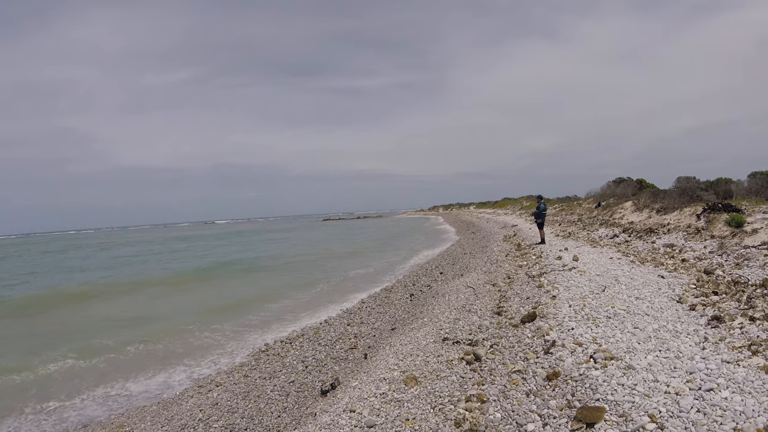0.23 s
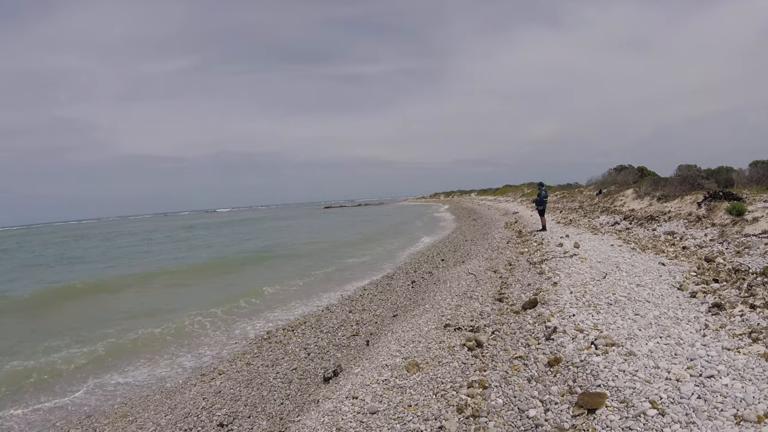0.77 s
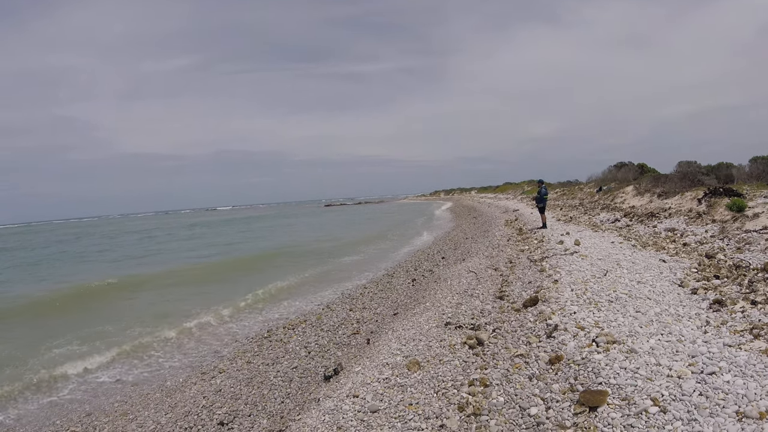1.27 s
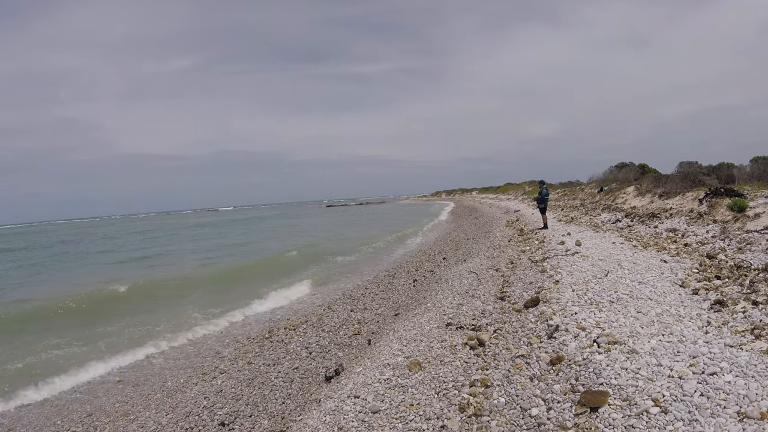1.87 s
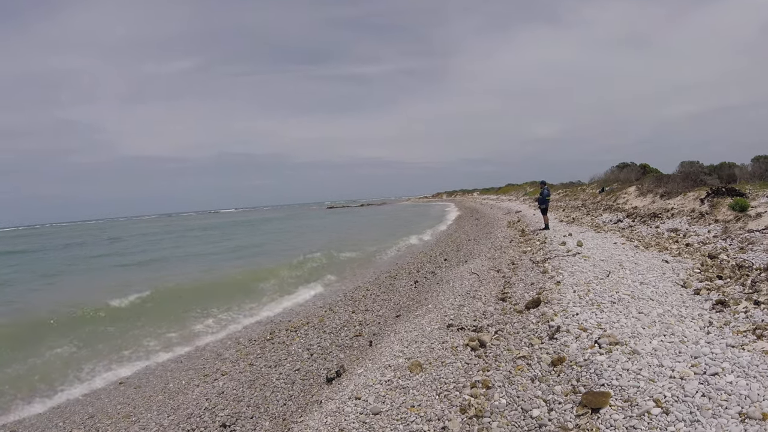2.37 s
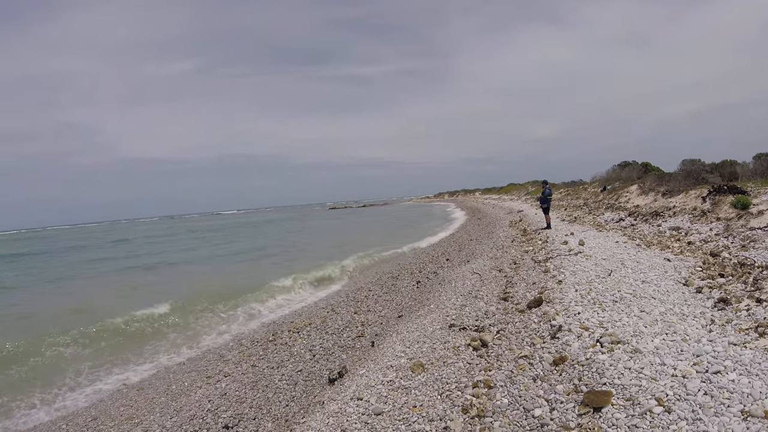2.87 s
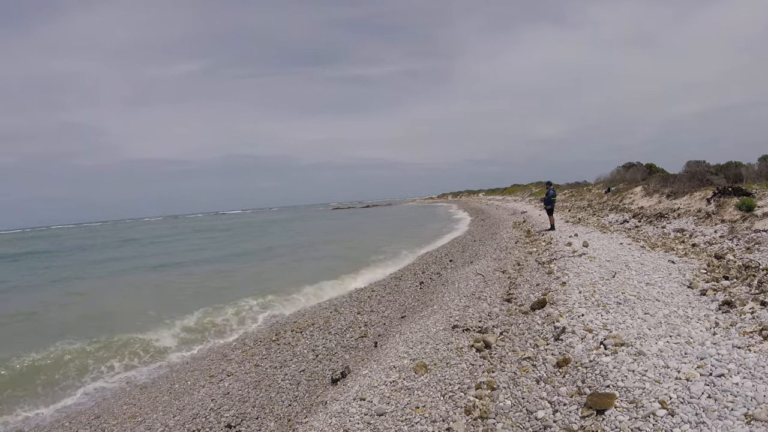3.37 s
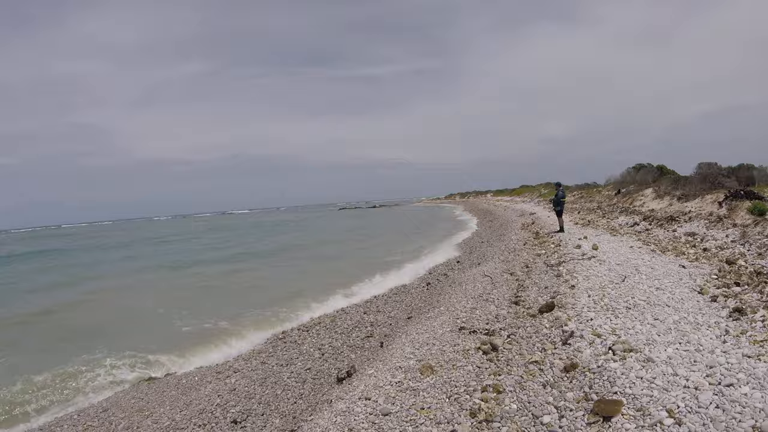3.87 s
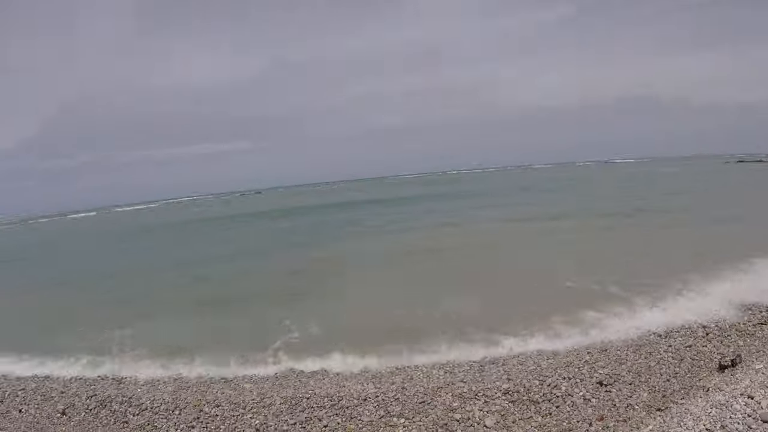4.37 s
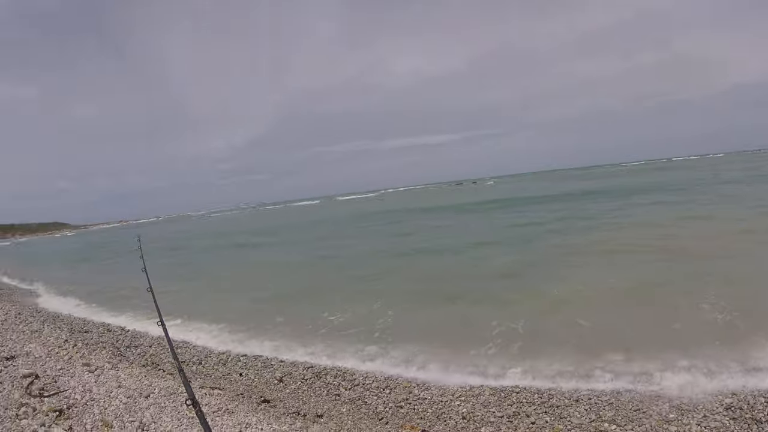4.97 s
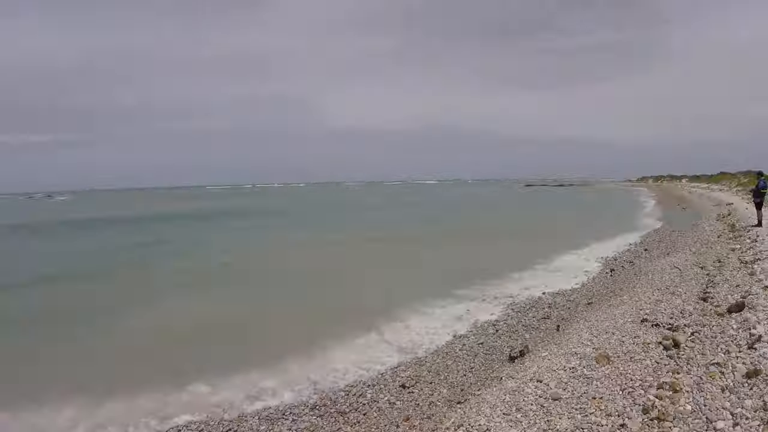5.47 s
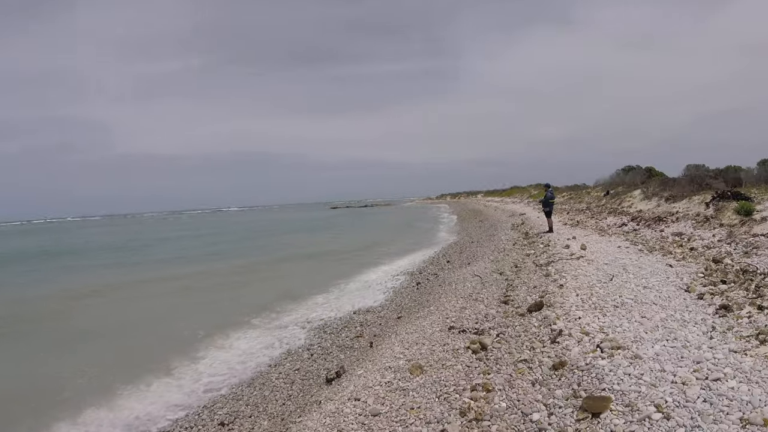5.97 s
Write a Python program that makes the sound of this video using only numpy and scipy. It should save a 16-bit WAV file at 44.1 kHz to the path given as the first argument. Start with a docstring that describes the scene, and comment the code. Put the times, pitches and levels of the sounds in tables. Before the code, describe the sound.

Low wind rumbles on the microphone throughout, on an open pebble beach with a faint hush of distant sea. A cluster of short, rough buffets hits in the first 0.7 seconds, and a couple of stones knock around 1 second. From about 1.2 seconds a small wave spills along the shore, with several watery plops until 1.9 seconds and a light fizz of foam. More wind thuds land between 2 and 3.3 seconds. The surf builds from about 3 seconds, and a larger wave breaks close by near 3.8 seconds with a soft boom. It churns and hisses up the shingle, rolling stones, strongest from 4.2 to 5 seconds. It then drains back with thinning, crackling foam and single pebbles clicking. From about 5.9 seconds another run of strong buffets strikes the microphone.

```python
"""Wind rumbles on the microphone and hits it in short, rough buffets, on an open pebble beach.
A small wave spills along the shore with a few plops; a larger one breaks close by, fizzes up the
shingle and drains back, leaving single stones clicking. The wind is low pressure noise, swelled by
gusts. The surf is clouds of tiny rings over a noise bed: air pockets boom, bubbles churn, stones
roll and foam fizzes."""
import sys
import numpy as np
from scipy import signal
from scipy.fft import rfft, irfft, next_fast_len
from scipy.io import wavfile
from scipy.ndimage import uniform_filter1d, minimum_filter1d

SR = 44100
rng = np.random.default_rng(int(sys.argv[2]) if len(sys.argv) > 2 else 0)


def unload_wav(signal):
    """Save mono or channel-first audio to the path in sys.argv[1] as 16-bit WAV at rate SR, clipped to [-1, 1]."""
    wavfile.write(
        sys.argv[1],
        SR,
        np.round(np.clip(np.atleast_2d(signal).T, -1, 1) * 32767).astype(np.int16),
    )


N = 274344
TIME = np.arange(N) / SR

# Cue sheets; levels are relative, ahead of each layer's trim and swing.
# wind strength on the microphone: t/s, level/dB
WIND_RIDE = [(0, -21), (.22, -19), (.7, -17), (.97, -22), (1.2, -17), (1.9, -19), (2.8, -18), (3.4, -17.5),
             (4.3, -18), (4.58, -19), (4.8, -18.5), (5.55, -19), (5.95, -15.5), (6.22, -17)]
# single gusts: centre t/s, half-width/s, heave level/dB, flutter level/dB
GUST_CUES = [(0.195, 0.071, -16.5, -38), (0.427, 0.27, -14.5, -19.5), (0.855, 0.084, -13, -24.5),
             (1.08, 0.044, -12, -21), (1.207, .08, -16.5, -20), (1.398, 0.017, -13, -20.5),
             (1.578, 0.05, -15.5, -30), (1.72, 0.13, -15.5, -23), (2.103, 0.04, -13.5, -26),
             (2.166, 0.035, -26, -16), (2.306, 0.073, -13, -25.5), (2.43, 0.028, -10, -24),
             (2.664, 0.16, -19, -21.5), (2.98, 0.057, -18, -19.5), (3.209, 0.073, -12.5, -20),
             (3.485, 0.056, -32, -21.5), (3.902, 0.063, -18, -21), (4.113, 0.059, -32, -21),
             (4.286, .05, -26, -19), (4.707, 0.031, -14, -24), (4.88, .12, -14, -27),
             (5.15, 0.033, -14, -31), (5.26, 0.15, -17, -31), (5.593, 0.038, -24, -21),
             (5.783, 0.029, -15, -21)]
# vortex hits: t/s, thud level/dB, length/s, rasp level/dB
BUFFET_CUES = [(0.017, -14.5, 0.0078, -39), (0.246, -13, 0.01, -32), (0.321, -15.5, 0.019, -29),
               (0.338, -18.5, 0.027, -29), (0.367, -21, 0.019, -25), (0.422, -10.5, 0.012, -24),
               (0.451, -30, 0.0062, -20), (0.465, -15.5, 0.03, -50), (0.514, -16.5, .018, -26),
               (0.574, -20.5, 0.014, -28), (0.637, -14, 0.024, -33), (0.671, -18.5, 0.008, -22),
               (1.838, -16, 0.069, -53), (2.145, -11, 0.024, -31), (2.244, -15.5, 0.11, -41),
               (2.332, -12, 0.02, -25), (2.679, -13.5, 0.016, -45), (2.943, -15.5, 0.013, -24.5),
               (3.196, -11, 0.019, -21.5), (3.289, -14.5, 0.04, -43), (5.876, -14.5, 0.046, -31),
               (5.881, -14, 0.013, -20), (5.938, -11, 0.021, -30), (5.95, -23, 0.03, -19),
               (5.979, -12, 0.035, -28), (6.017, -14, 0.042, -23), (6.052, -9, 0.011, -21),
               (6.14, -12, 0.029, -23)]
# short sharp clicks (a tick of wind rasp at 0.45 s, then stones knocking): t/s, level/dB, f/Hz
CLICK_CUES = [(.1666, -37, 2280), (.45, -22.5, 2070), (.4829, -25.5, 2550), (0.902, -16.5, 1800),
              (0.9747, -30, 3370), (1.028, -17, 1770), (1.723, -31, 2400), (2.0439, -28, 2900),
              (5.0974, -27, 5030), (5.207, -24, 5160), (5.6611, -41, 5600), (5.8013, -34, 4950),
              (6.0872, -29, 3080)]
# large bubbles in the spilling crest: t/s, level/dB, starting f/Hz
PLOP_CUES = [(1.315, -17.5, 1220), (1.35, -17.5, 1070), (1.504, -18, 1070), (1.575, -20, 950),
             (1.775, -19.5, 910), (1.868, -19.5, 1240), (2.547, -25.5, 1044)]
# waves running up: t/s, hold/s, build/(dB/s), ebb/(dB/s), churn level/dB, shingle level/dB
RUN_UPS = [(1.2, 0.68, 11, 12, -32.5, -37.5), (4.271, .68, 12.5, 23, -23.5, -29.5),
           (6.45, .6, 20, 20, -25, -40)]
# stretches of crest collapsing:
# t/s, rise per 10 dB/s, foam hold/s, foam level/dB, plunge level/dB, plunge hold/s
COLLAPSES = [(1.285, 0.23, 0.49, -50, -34.5, 0.22), (1.596, 0.33, .95, -44.5, -33, 0.18),
             (2.826, 0.27, 0.83, -43.5, -37, 0.22), (3.21, 0.1, 1.4, -39, -29.5, 0.33),
             (3.756, 0.14, 0.6, -34, -20.5, 0.08), (4.216, 0.13, .55, -29, -23, 0.3),
             (6.35, 0.98, .5, -48.5, -40, .3)]

# EQ curves, all f/Hz, level/dB
FAR_SEA_EQ = [(300, -3), (800, 5.5), (2000, -10), (4000, -19), (7000, -19.5), (11000, -26.5),
              (12000, -13.5), (15000, -32)]  # distant hush
HEAVE_EQ = [(5, -46), (16, -4), (26, 3.5), (40, 0), (80, -4), (110, -13.5), (200, -30), (500, -81.5)]  # large eddies
FLUTTER_EQ = [(55, -19), (90, 0), (120, -2), (200, -9.5), (290, -16), (500, -26), (1000, -42), (3000, -75),
              (10000, -84)]  # small eddies
THUD_EQ = [(60, -11.5), (125, 1.5), (190, 1), (260, -8), (400, -15.5), (650, -23.5), (1500, -61),
           (4000, -88)]  # body of a buffet
RASP_EQ = [(200, 0), (400, 7.5), (600, 5.5), (900, -2.5), (1250, -13.5), (2200, -23.5), (3300, -33.5),
           (5500, -65), (9000, -89)]  # its torn edge
FIZZ_EQ = [(1500, -7.5), (3200, -5), (4200, -10.5), (4600, -4.5), (5100, 1), (6100, -0.5), (6900, -11.5),
           (8500, -14.5), (10500, -20), (15000, -34.5)]  # fresh foam
SPRAY_EQ = [(3000, 1.5), (6000, -3), (8000, -2.5), (10500, -4.5), (15000, -17)]  # flying droplets
CRACKLE_EQ = [(2000, -14), (4200, -7), (5500, 0), (7000, -5), (10500, -8), (15000, -19)]  # single foam bursts
PLUNGE_EQ = [(90, -34), (200, 3.5), (330, -1.5), (550, -5), (800, -11), (1300, -16), (3000, -56)]  # trapped air pockets
CHURN_EQ = [(200, -22.5), (450, -0.5), (750, -2), (1100, -1.5), (1400, -5), (1900, -12.5), (4000, -54)]  # bubbling water
SHINGLE_EQ = [(800, 1), (1500, -6.5), (2000, 1.5), (2400, -2), (2800, -8), (3300, -9.5), (4200, -17),
              (6000, -19.5), (9000, -34), (15000, -52)]  # rolling stones
HOUSING_EQ = [(10600, 0.5), (11300, -6.5), (12000, -15), (13400, -2.5), (15000, -9)]  # microphone housing, notched near 12 kHz
TICK_EQ = [(2500, -5), (4000, -8), (7000, -31)]  # settling pebbles
SPLASH_EQ = [(500, -13), (1100, 10), (2000, -6), (3500, -23), (8000, -43)]  # water landing


def from_db(db):
    """Decibels to gain."""
    return 10 ** (np.asarray(db) / 20)


def rms_one(x):
    """Scale to unit power."""
    return x / np.sqrt(np.mean(x ** 2) + 1e-20)


def together(gains):
    """Unrelated noises add in power."""
    return np.sqrt(sum(g ** 2 for g in gains))


def envelope(start, hold, rise_db_per_s, fall_db_per_s, sag_db_per_s=0):
    """Gain that climbs to 1 at start, sags while it holds, then dies away."""
    age = TIME - start
    return from_db(-rise_db_per_s * np.maximum(-age, 0)
                   - sag_db_per_s * np.clip(age, 0, hold)
                   - fall_db_per_s * np.maximum(age - hold, 0))


def coloured(x, eq):
    """Apply an EQ curve whose points are joined on a log-frequency axis."""
    hz, db = np.transpose(eq)
    size = next_fast_len(N + SR // 10)
    bins = np.maximum(np.fft.rfftfreq(size, 1 / SR), 1)
    gain = from_db(np.interp(np.log(bins), np.log(hz), db))
    return irfft(rfft(x, size) * gain, size)[:N]


def drift(rate):
    """Smooth random wobble of spread 1 that changes about rate times a second."""
    bins = np.fft.rfftfreq(N, 1 / SR)
    return rms_one(irfft(rfft(rng.standard_normal(N)) / (1 + (bins / rate) ** 4), N))


def ring(clicks, hz, t60):
    """Each click sets a damped sine ringing."""
    r = from_db(-60 / (t60 * SR))
    w = 2 * np.pi * min(hz, .45 * SR) / SR
    return signal.lfilter([0, np.sin(w)], [1, -2 * r * np.cos(w), r * r], clicks + 1e-18)


def turbulence(eq, even_s):
    """Pressure noise whose strength holds steady over spans longer than even_s."""
    x = coloured(rng.standard_normal(N), eq)
    span = max(int(even_s * SR), 2)
    power = uniform_filter1d(uniform_filter1d(x ** 2, span), span)
    return x / np.sqrt(power + 1e-12)


def grains(per_s, low_hz, high_hz, cycles, spread_db, count=24):
    """A cloud of short rings of random size and pitch, with an even spectrum between the edges."""
    sizes = from_db(spread_db * np.minimum(rng.exponential(1, N), 4.5)) * rng.choice([-1, 1], N)
    clicks = sizes * (rng.random(N) < per_s / SR)
    voice = rng.integers(0, count, N)
    pitches = np.geomspace(low_hz, high_hz, count)
    return rms_one(sum(np.sqrt(hz) * rms_one(ring(clicks * (voice == k), hz, cycles / hz))
                       for k, hz in enumerate(pitches)))


def wash(near, eq, far_db, surge_db, surge_rate):
    """Near grains sit in the smooth sum of far ones, and all surge together by surge_db."""
    mix = coloured(near + from_db(far_db) * rng.standard_normal(N), eq)
    return rms_one(rms_one(mix) * from_db(surge_db * drift(surge_rate)))


def far_sea(level_db=-49):
    """The distant sea blurs into a steady bed of hush."""
    return from_db(level_db) * rms_one(coloured(rng.standard_normal(N), FAR_SEA_EQ))


def settling(level_db=-58):
    """Loose pebbles tick here and there along the water's edge."""
    ticks = grains(240, 1430, 4800, cycles=11, spread_db=2.5)
    return from_db(level_db) * rms_one(coloured(ticks, TICK_EQ))


def wind(heave_db=-18.5, breeze_db=-24.5, calm_hz=260, wake_db=-3.5, wake_s=0.034):
    """Large eddies heave the diaphragm; small ones flutter, dull in a breeze, brighter in gusts."""
    strength_db = np.interp(TIME, *np.transpose(WIND_RIDE))
    swing_db = strength_db - strength_db.mean()
    heave = from_db(heave_db + swing_db + 1.6 * drift(8.4))
    breeze = from_db(breeze_db + swing_db + 3.5 * np.minimum(drift(14.4), 1))  # deep lulls, mild peaks
    puffs = np.zeros(N)
    for t, width, gust_db, puff_db in GUST_CUES:
        bell = np.exp(-2 * np.minimum(np.abs(TIME - t) / width, 10) ** 2)
        heave = together([heave, from_db(gust_db) * bell])
        puffs = together([puffs, from_db(puff_db) * bell])
    for t, thud_db, length, _ in BUFFET_CUES:  # eddies trail each buffet
        wake = from_db(thud_db + wake_db) * envelope(t + length, 0, 20 / length, 10 / wake_s)
        puffs = np.maximum(puffs, wake)
    lowpass = signal.butter(2, calm_hz, fs=SR, output="sos")
    calm = signal.sosfilt(lowpass, turbulence(FLUTTER_EQ, even_s=0.022))
    return (heave * turbulence(HEAVE_EQ, even_s=0.064)
            + breeze * calm
            + puffs * turbulence(FLUTTER_EQ, even_s=0.031))


def buffets(thud_trim_db=-2.5, tear_db=1.0, thud_rise_s=0.0015, rasp_rise_s=0.0027):
    """A vortex hits the port: an abrupt thud with a torn rasp on top, gone once it has passed."""
    thud, rasp = np.zeros(N), np.zeros(N)
    for t, thud_db, length, rasp_db in BUFFET_CUES:
        age = np.maximum(TIME - t, 0)
        passing = np.exp(-np.minimum(age / length, 3) ** 4)
        thud += from_db(thud_db + thud_trim_db) * passing * np.minimum(age / thud_rise_s, 1)
        rasp += from_db(rasp_db) * passing * np.minimum(age / rasp_rise_s, 1)
    torn = rms_one(turbulence(RASP_EQ, even_s=0.0018) * from_db(tear_db * drift(230)))
    return thud * turbulence(THUD_EQ, even_s=0.0056) + rasp * torn


def sharp_clicks(trim_db=-2, lowpass_hz=5500, t60=.01):
    """Three quickly damped modes, top softened, voice a tick of wind rasp or a wet stone's knock."""
    modes = np.zeros(N)
    for t, db, hz in CLICK_CUES:
        click = np.zeros(N)
        click[int(t * SR)] = from_db(db + trim_db)
        modes += (ring(click, hz, t60)
                  + .2 * ring(click, 1.35 * hz, t60)
                  + .15 * ring(click, 1.6 * hz, t60 / 2))
    return signal.sosfilt(signal.butter(2, lowpass_hz, fs=SR, output="sos"), modes)


def plops(t60=0.024, glide=8.0, trim_db=-2, splash_db=-7, splash_t60=0.045, rise_s=0.0018):
    """A lump of water splashes in and traps a bubble, whose pitch climbs as it nears the surface."""
    bubbles, splash = np.zeros(N), np.zeros(N)
    age = np.arange(SR // 10) / SR
    for t, db, hz in PLOP_CUES:
        span = slice(int(t * SR), int(t * SR) + len(age))
        chirp = np.sin(2 * np.pi * hz * age * (1 + glide * age))
        bubbles[span] += from_db(db + trim_db - 60 * age / t60) * chirp
        splash[span] += from_db(db + splash_db - 60 * age / splash_t60) * np.minimum(age / rise_s, 1)
    return bubbles + splash * turbulence(SPLASH_EQ, even_s=.01)


def foam(old_foam_db=-74, spray_db=-32, spray_growth=1.4, crackle_db=-18, crackle_lag_s=0.15):
    """Each collapse leaves fizz; a heavy one adds bright spray, and thin foam crackles in the tail."""
    fresh, thin = from_db(old_foam_db), 0
    for t, rise, hold, db, _, _ in COLLAPSES:
        # foam thins while it lies, then sinks into the stones
        lying = envelope(t, hold, 10 / rise, fall_db_per_s=34, sag_db_per_s=2)
        bursting = envelope(t + crackle_lag_s, hold, 10 / rise, fall_db_per_s=19.5)
        fresh = together([fresh, from_db(db) * lying])
        thin = together([thin, from_db(db + crackle_db) * bursting])
    bubbles = grains(12000, 2170, 12200, cycles=3.8, spread_db=2.5)
    fizz = wash(bubbles, FIZZ_EQ, far_db=3, surge_db=0.76, surge_rate=28)
    droplets = grains(5700, 5000, 15000, cycles=2.2, spread_db=-1.5)
    spray = wash(droplets, SPRAY_EQ, far_db=5, surge_db=1.8, surge_rate=19)
    spray_gain = from_db(spray_db) * (fresh / fresh.max()) ** spray_growth
    bursts = (rng.random(N) < 300 / SR) * from_db(2.2 * np.minimum(rng.exponential(1, N), 3))
    crackle = rms_one(coloured(bursts * rng.choice([-1, 1], N), CRACKLE_EQ))
    return fresh * fizz + spray_gain * spray + thin * crackle


def surf(plunge_lag_s=0.039, kick_db=-16.5, lapping_db=-56, growth_db_per_s=2.5, shingle_lead_s=0.11):
    """Air pockets boom where a crest collapses; bubbles churn and stones roll as each wave runs up."""
    plunge = together(from_db(db) * envelope(t + plunge_lag_s, hold, 10 / rise, fall_db_per_s=12.5)
                      for t, rise, _, _, db, hold in COLLAPSES)
    churn = from_db(lapping_db)  # the water never rests between waves
    shingle = from_db(kick_db) * plunge  # each plunge throws stones about
    for t, hold, build, ebb, churn_db, shingle_db in RUN_UPS:
        # the water grows wilder as it runs up, and stones roll ahead of it
        running = envelope(t, hold, build, ebb, sag_db_per_s=-growth_db_per_s)
        rolling = envelope(t - shingle_lead_s, hold, build, ebb)
        churn = together([churn, from_db(churn_db - growth_db_per_s * hold / 2) * running])
        shingle = together([shingle, from_db(shingle_db) * rolling])
    pockets = grains(600, 184, 924, cycles=14.4, spread_db=0.5)
    bubbles = grains(700, 306, 2460, cycles=15.7, spread_db=3)
    stones = grains(2000, 1365, 10400, cycles=5.9, spread_db=3)
    return (plunge * wash(pockets, PLUNGE_EQ, far_db=8, surge_db=0.3, surge_rate=18)
            + churn * wash(bubbles, CHURN_EQ, far_db=11.5, surge_db=0, surge_rate=16)
            + shingle * wash(stones, SHINGLE_EQ, far_db=3.5, surge_db=1.35, surge_rate=27))


def scene():
    """Open-air mono mix: the far sea behind, the shore a few metres off, wind right on the mic."""
    bed = far_sea()
    shore = surf() + foam() + plops() + settling()
    return (bed + shore + sharp_clicks() + wind() + buffets())[None]


def record(dry, ceiling=.76, cutoff_hz=15000):
    """The housing colours the treble, a limiter holds down the strongest gusts, the top is cut."""
    x = coloured(dry[0], HOUSING_EQ)
    span = SR // 100
    gain = np.minimum(1, ceiling / (np.abs(x) + 1e-9))
    limited = x * uniform_filter1d(minimum_filter1d(gain, span), span)
    return signal.sosfilt(signal.ellip(10, .1, 90, cutoff_hz, fs=SR, output="sos"), limited)[None]


dry = scene()
out = record(dry)
unload_wav(out)
```